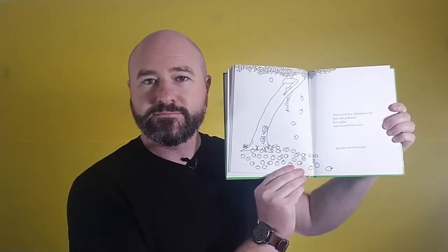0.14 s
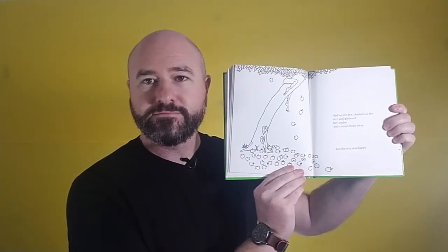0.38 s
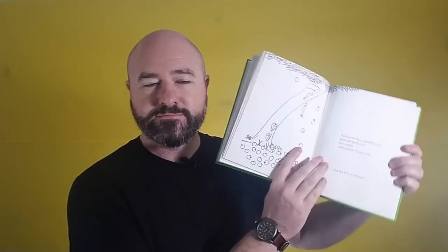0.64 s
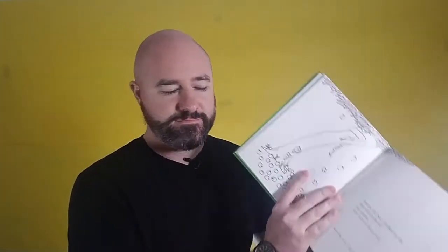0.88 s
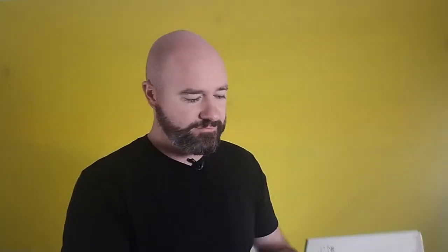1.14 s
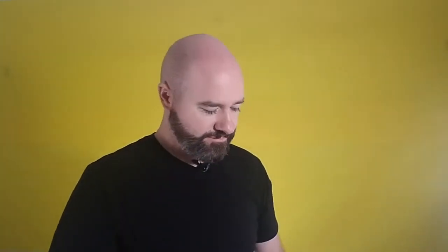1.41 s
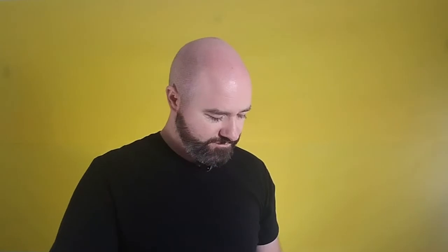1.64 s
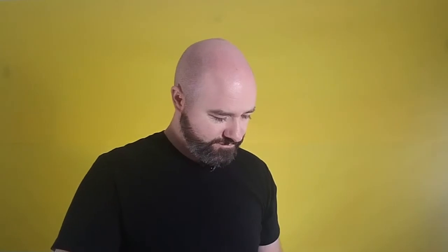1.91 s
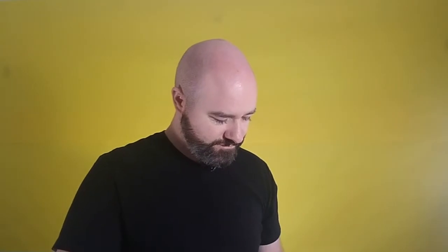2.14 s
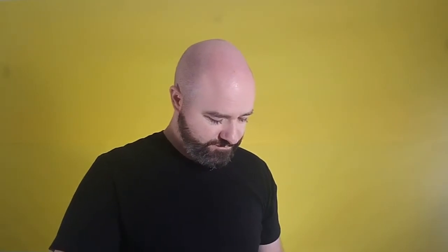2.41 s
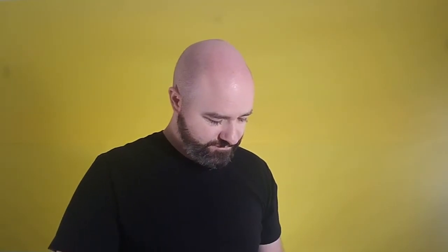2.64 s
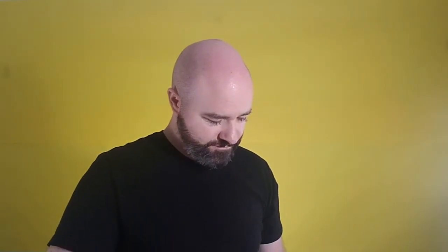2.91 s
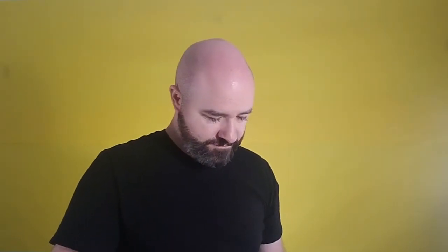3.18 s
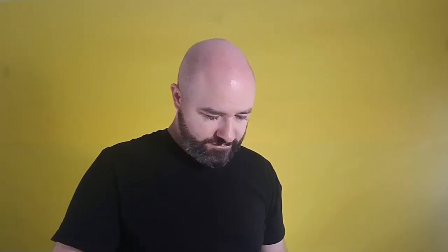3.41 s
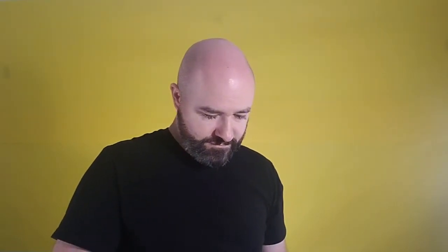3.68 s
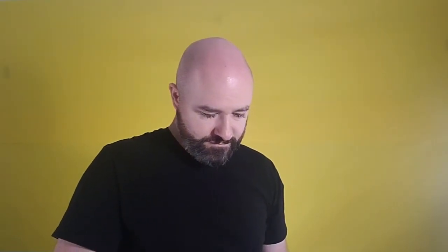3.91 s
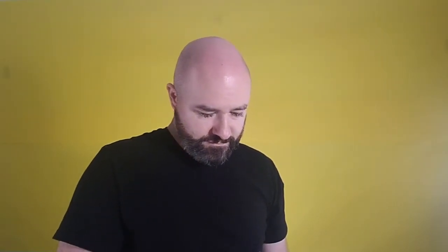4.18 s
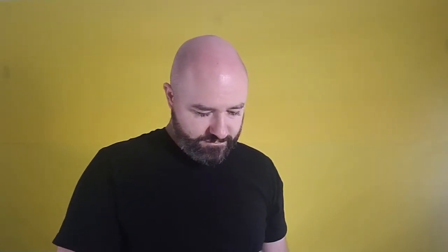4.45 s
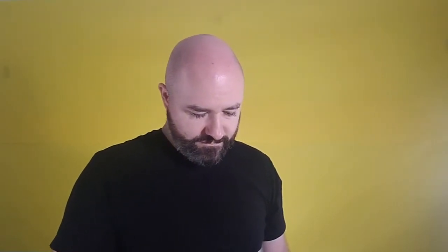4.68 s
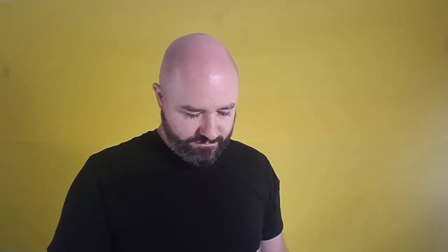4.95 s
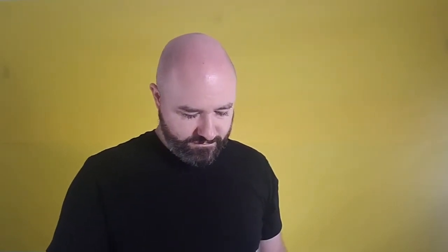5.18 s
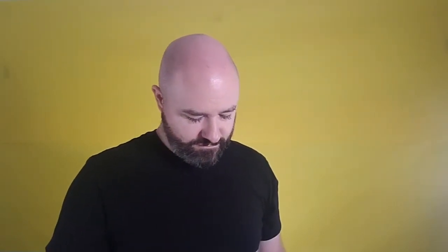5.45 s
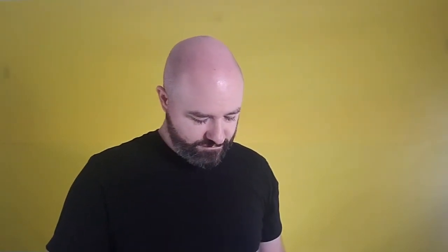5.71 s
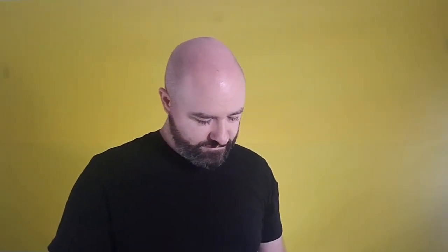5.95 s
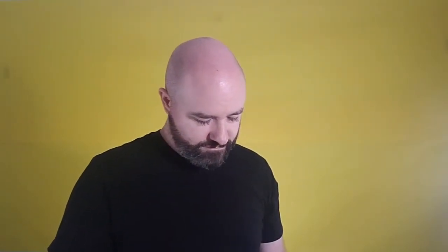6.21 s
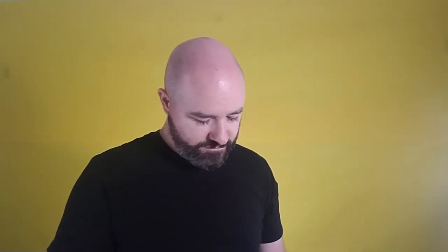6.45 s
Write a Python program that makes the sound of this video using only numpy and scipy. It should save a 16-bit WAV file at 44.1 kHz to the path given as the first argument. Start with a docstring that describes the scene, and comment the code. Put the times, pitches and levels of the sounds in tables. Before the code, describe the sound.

Close to a small clip-on microphone in a quiet, small room, a hardcover book is handled. First only faint scrapes and tiny ticks over a low hum; then light clicks, a rapid rattle of page edges leading into sharp hollow snaps, a lull with short scrapes, and a final few hard snaps and a dry sheet slide.

```python
"""A quiet room, a small clip-on microphone close to a hardcover book that is being leafed through.
Snaps: damped swings of page edges ring the book block, crack, and push and suck a puff of air.
Slides and rustle: random clicks of paper fibres through resonances, with a low sway and rumble of the body.
Underneath: narrow noise bands for the hum of the building, and a steady shaped background noise.
A short noise tail puts the paper sounds in the room; puffs, sway and rumble reach the microphone directly."""
import sys
import numpy as np
from scipy import signal
from scipy.fft import rfft, irfft
from scipy.io import wavfile
from scipy.ndimage import uniform_filter1d

SR = 44100
rng = np.random.default_rng(int(sys.argv[2]) if len(sys.argv) > 2 else 0)


def makeup_ratio(level_db):
    """Linear amplitude ratio for a level in decibels (20 dB per factor of ten)."""
    decades = np.asarray(level_db, float) / 20
    return 10 ** decades


def unload_wav(signal):
    """Save mono or channel-first audio to the path in sys.argv[1] as 16-bit WAV at rate SR, clipped to [-1, 1]."""
    wavfile.write(
        sys.argv[1],
        SR,
        np.round(np.clip(np.atleast_2d(signal).T, -1, 1) * 32767).astype(np.int16),
    )


N = 290442  # samples, about 6.6 s
TIME = np.arange(N) / SR


def level(x, db):
    """Scale to an rms level."""
    return x * makeup_ratio(db) / np.sqrt(np.mean(x ** 2))


def band(x, hz, width):
    """One steep resonance (applied twice), gain 1 at its centre."""
    b, a = signal.iirpeak(hz, hz / width / 1.5, fs=SR)
    once = signal.lfilter(b, a, x)
    return signal.lfilter(b, a, once)


def decay(t, t60):
    """Exponential decay that falls by 60 dB in t60 seconds."""
    return np.exp(-np.log(1000) * t / t60)


def ring(hz, t60, size=6000):
    """A decaying sine that starts from rest."""
    t = TIME[:size]
    return np.sin(2 * np.pi * hz * t) * decay(t, t60)


def walk(rate):
    """Random levels held 1 / rate s and smoothed twice; spread near 1."""
    hold = int(SR / rate)
    steps = np.repeat(rng.standard_normal(N // hold + 1), hold)
    smooth = uniform_filter1d(uniform_filter1d(steps, hold), hold)
    return 1.3 * smooth[:N]


# Narrow hum bands of the building: (pitch_hz, width_hz, level_db), level as rms
HUM_BANDS = [(58, 2.4, -84), (82, 5.7, -81.5), (117.7, 4.3, -69), (147.8, 2.3, -75.5), (177.9, 5.1, -71.5),
             (236.8, 1, -80.5)]


def building_hum():
    """Narrow bands of noise waver like a hum."""
    return sum(level(band(rng.standard_normal(N), hz, width), db) for hz, width, db in HUM_BANDS)


# Spectrum shape of the steady background noise, with a steep fall above 12.6 kHz:
# (freq_hz, relative_db), density per Hz
BACKGROUND_SPECTRUM = [(15, -44), (25, -5.5), (66, 4.5), (167, -8), (375, -28.5), (700, -29), (909, -25.5),
                       (2380, -36), (12600, -41), (16400, -80.5), (22000, -120)]


def background_noise():
    """Steady random noise, shaped in frequency: strongest in the bass, with a faint even hiss above."""
    hz, db = np.transpose(BACKGROUND_SPECTRUM)
    bins = np.maximum(np.arange(N // 2 + 1) * SR / N, 1)
    shape = makeup_ratio(np.interp(np.log(bins), np.log(hz), db))
    noise = irfft(rfft(rng.standard_normal(N)) * shape, N)
    return level(noise, -65)  # dB rms


# Decay of the small room by band: (band_hz, relative_db, t60_s)
ROOM_TAIL = [(310, -13, 0.26), (700, -25.5, 0.32), (1400, -30.5, 0.31), (2600, -23, 0.19),
             (4970, -25.5, 0.086), (9610, -36.5, 0.048)]


def room(x):
    """A small damped room: a noise tail that builds over a few ms and dies sooner in the treble."""
    t = TIME[:20000]
    tail = np.zeros(len(t))
    for hz, db, t60 in ROOM_TAIL:
        tail += makeup_ratio(db) * band(rng.standard_normal(len(t)), hz, 1.1 * hz) * decay(t, t60)
    build_up = np.clip((t - 0.002) / 0.0014, 0, 1)
    return x + signal.fftconvolve(x, 0.099 * tail * build_up)[:N]


def fibres(per_s, spread_db, resonances):
    """Paper fibres catch and slip: tiny clicks of uneven size through the paper's resonances."""
    sizes = rng.standard_normal(N) * makeup_ratio(spread_db * rng.exponential(size=N))
    clicks = (rng.random(N) < per_s / SR) * sizes
    paper = np.zeros(N)
    for k, (hz, width, db) in enumerate(resonances):
        flicker = makeup_ratio(db + 2.0 * walk(28))
        # neighbouring resonances alternate in sign, so they add up between their peaks
        paper += (-1) ** k * flicker * band(clicks, hz, width)
    return level(paper, 0)


def body_rumble(body_db):
    """Arms and clothes rumble near the microphone, more when the hands are busy."""
    low = band(rng.standard_normal(N), 70, 54)
    upper = 0.31 * band(rng.standard_normal(N), 210, 120)
    busy_db = body_db + 73
    # a little over a quarter dB of rumble per dB of rustle, with a slow wander
    rumble_db = -64.5 + 0.27 * busy_db + 1.5 * walk(6.7)
    return makeup_ratio(rumble_db) * level(low + upper, 0)


# Paper under friction, body of the sound: (pitch_hz, width_hz, relative_db)
PAPER_BODY_MODES = [(510, 1380, 15.5), (950, 500, 19.5), (1450, 630, -10), (1940, 170, -0.5)]
# Paper under friction, treble, heard in rustle and slides: (pitch_hz, width_hz, relative_db)
PAPER_TREBLE_MODES = [(3030, 1100, 3.5), (5070, 1000, -7), (7160, 1500, -13.5), (10070, 2500, -36.5)]
# Hands moving on the paper, levels joined by straight lines: (start_s, body_level_db, treble_level_db)
HAND_MOVES = [(0.0, -85.5, -105), (0.73, -81.5, -84), (1.3, -72.5, -88), (1.7, -80, -91),
              (2.15, -81, -89.5), (2.4, -75.5, -71.5), (2.62, -71.5, -88), (2.84, -68.5, -108),
              (3.34, -68, -83.5), (3.8, -65, -80), (4.05, -88.5, -87.5), (4.2, -62, -82),
              (4.64, -76.5, -106), (5.1, -76, -87.5), (5.25, -64, -89), (5.5, -76, -97), (5.92, -72.5, -80),
              (6.59, -61, -100)]


def hands():
    """Continuous rustle of fingers and sleeves, and the rumble of the moving body."""
    start_s, body_points, treble_points = np.transpose(HAND_MOVES)
    body_db = np.interp(TIME, start_s, body_points)
    treble_db = np.interp(TIME, start_s, treble_points)
    body = makeup_ratio(body_db) * fibres(8900, 1.3, PAPER_BODY_MODES)
    treble = makeup_ratio(treble_db) * fibres(12000, 4.1, PAPER_TREBLE_MODES)
    patchy = makeup_ratio(2.0 * walk(40))
    return patchy * (body + treble), body_rumble(body_db)


# Sheets sliding over each other: (start_s, length_s, level_db, pitch_hz, treble_db),
# treble relative to the scrape
SHEET_SLIDES = [(0.645, 0.052, -58.5, 950, -15.5), (0.729, 0.073, -62.5, 620, -8),
                (1.082, 0.04, -56.5, 950, -25), (1.131, 0.015, -62.5, 920, -14.5),
                (1.365, 0.02, -63, 480, -34), (1.433, 0.19, -76, 1500, -0.5), (1.522, 0.033, -57, 740, -30),
                (1.797, .13, -75.5, 1080, -9.5), (1.937, 0.013, -66, 1180, -7),
                (2.183, 0.088, -73.5, 1210, -10), (2.676, 0.0061, -60, 700, -0.5),
                (3.022, .026, -76, 2400, 6.5), (3.102, 0.02, -60, 950, -34), (3.147, 0.066, -68, 1810, -9),
                (3.331, 0.0085, -57.5, 2200, -5.5), (3.263, 0.037, -55, 1560, -8.5),
                (3.682, 0.027, -52, 1400, -8.5), (3.717, 0.024, -63, 1400, -5.5),
                (3.806, 0.053, -58, 1280, -8.5), (4.273, 0.087, -61, 1070, -4),
                (5.029, 0.053, -67.5, 1090, -4.5), (5.155, 0.027, -51, 1120, -4.5),
                (5.18, 0.014, -48.5, 1050, -5.5), (5.19, 0.09, -62.5, 1320, -5),
                (5.293, 0.066, -65.5, 1110, -8), (5.656, 0.12, -67.5, 1260, -12.5),
                (6.348, 0.0094, -55.5, 1450, -16), (6.379, 0.05, -71, 1510, -14),
                (6.448, 0.062, -47, 1500, -9), (6.55, 0.025, -54.5, 1400, -8)]


def slides():
    """A sheet grips, drags for a moment and lets go; its free span sets the pitch of the scrape."""
    grip_share, release_s = 0.19, 0.01  # share of the length spent gathering grip; fade after it
    scrapes, low = np.zeros((2, N))
    grit = fibres(5000, 2.8, [(900, 1500, 0), (2000, 1500, 0)])
    fizz = fibres(9000, 2.2, PAPER_TREBLE_MODES)
    sway = level(band(rng.standard_normal(N), 70, 106), 0)
    for start, length, db, hz, treble_db in SHEET_SLIDES:
        i = slice(int(start * SR), int((start + length + 0.022) * SR))
        t = TIME[i] - start
        grip = np.clip(t / (grip_share * length), 0, 1)
        let_go = np.clip((length - t) / release_s + 1, 0, 1)
        drag = grip * let_go
        scrape = level(band(grit[i], hz, 0.78 * hz), 0)
        scrapes[i] += makeup_ratio(db) * drag * (scrape + makeup_ratio(treble_db) * fizz[i])
        # the hand that drags it sways the whole book
        low[i] += makeup_ratio(0.52 * db - 26.0) * drag * sway[i]
    return makeup_ratio(2.6 * walk(120)) * scrapes, low


# Thud of the hard cover: (pitch_hz, relative_db, t60_s)
COVER_MODES = [(242, -4, 0.043), (403, -1, 0.025), (587, -20, 0.004)]


def puff():
    """The freed page pushes air out with a low thud of the cover, then sucks it back."""
    push_s, suck_s = 0.0105, 0.0063
    t = TIME[:6000]
    push = np.sin(np.pi * np.clip(t / push_s, 0, 1))
    suck = np.sin(np.pi * np.clip((t - push_s) / suck_s, 0, 1))
    thud = sum(makeup_ratio(db) * ring(hz, t60) for hz, db, t60 in COVER_MODES)
    return push - 1.72 * suck + thud


def swing(hz, cycles):
    """A swing that peaks after the given number of cycles and is soon damped; envelope top 1."""
    t = TIME[:6000]
    u = t * hz / cycles
    return np.sin(2 * np.pi * hz * t) * (u * np.exp(1 - u)) ** 2


# Modes of the book block, before scatter: (pitch_hz, relative_db, t60_s)
BOOK_MODES = [(772, -2.5, 0.039), (897, -5, .035), (1190, -8, 0.016), (1470, -7.5, 0.0077),
              (1890, -34, 0.014), (2480, 0, 0.028), (3300, -21, 0.015), (4700, -32, .017)]


def book_block(louder, higher):
    """Each page lands elsewhere on the block, so its modes scatter in level and pitch."""
    scatter_db, pitch_scatter = 4, 0.05  # spread in dB, and as a share of the pitch
    block = np.zeros(6000)
    for (hz, db, t60), a, b in zip(BOOK_MODES, louder, higher):
        block += makeup_ratio(db + scatter_db * a) * ring(hz * (1 + pitch_scatter * b), t60)
    return block


# Resonances in the crack of a released edge: (pitch_hz, width_hz, relative_db)
CRACK_MODES = [(790, 900, 8), (2700, 3450, 21), (4830, 4330, 17.5), (8450, 3100, 16), (14100, 2400, -6)]


def crack(ticks, bright_ticks):
    """Ticks and rattle sound through the edge's resonances; the top ones take the brighter ticks."""
    out = np.zeros(len(ticks))
    for k, (hz, width, db) in enumerate(CRACK_MODES):
        source = bright_ticks if hz > 7000 else ticks
        out += (-1) ** k * makeup_ratio(db) * band(source, hz, width)
    return out


# Page edges let go close to the microphone: (start_s, level_db, pitch_hz, crack_db),
# level before block and room, crack relative to it
PAGE_SNAPS = [(0.733, -54.5, 2980, 9.5), (0.751, -54.5, 1060, 7.5), (0.94, -48.5, 1520, -5),
              (1.067, -50.5, 1210, -18), (1.281, -50.5, 1430, -13), (1.933, -48, 1490, -16),
              (2.726, -30.5, 1540, -12.5), (2.811, -27, 1720, -9), (3.003, -43, 2440, -10),
              (3.331, -27, 1470, -23), (3.366, -36.5, 1400, -19), (3.386, -34.5, 1400, -33),
              (3.398, -34, 1400, -23.5), (3.418, -34, 1590, -22.5), (3.437, -32.5, 1400, -30),
              (3.458, -36.5, 1560, -21.5), (3.475, -30.5, 1500, -20), (3.4785, -15, 1406, -23),
              (3.515, -36, 1310, -18.5), (3.538, -32, 1580, -23), (3.58, -30, 1510, -16),
              (3.583, -13.5, 1338, -18), (3.873, -31.5, 1340, -22), (3.908, -27.5, 1400, -18),
              (3.922, -28, 1370, -19), (3.936, -27.5, 1334, -15.5), (3.992, -24.5, 1460, -15.5),
              (3.9964, -10, 1354, -14.5), (4.118, -13.5, 1460, -16), (4.163, -22.5, 1242, -10),
              (4.719, -56, 1180, -21), (5.406, -50.5, 1950, -9.5), (5.757, -46.5, 1450, -9.5),
              (5.889, -22, 1470, -16), (5.992, -43, 1600, -18), (6.059, -13, 1423, -16),
              (6.2, -11.5, 1423, -14.5), (6.276, -34.5, 1210, -7), (6.373, -47, 1640, -29),
              (6.453, -27.5, 1200, -25), (6.551, -22, 1470, -29), (6.566, -22.5, 1450, -40)]


def snaps():
    """Each edge springs back (rarefaction first), rings the book block, cracks and pushes air."""
    edge_cycles, rattle_s = 0.85, 0.0024  # cycles to the top of the swing; decay time of the rattle
    edges, ticks, bright_ticks, puffs = np.zeros((4, N + 6000))
    air = puff()
    for start, db, hz, crack_db in PAGE_SNAPS:
        i = int(start * SR)
        edge = -makeup_ratio(db) * swing(hz, edge_cycles)
        block = book_block(*rng.standard_normal((2, len(BOOK_MODES))))
        edges[i:i + 6000] += edge + makeup_ratio(-32.5) * signal.fftconvolve(edge, block)[:6000]
        # one clean tick as the edge swings through, amid fibres that rattle for a few ms
        rattle = 0.072 * rng.standard_normal(400) * np.exp(-TIME[:400] / rattle_s)
        rattle[int(edge_cycles / hz * SR)] += 1
        ticks[i:i + 400] += makeup_ratio(db + crack_db) * rattle
        # a harder release is brighter
        bright_ticks[i:i + 400] += makeup_ratio(0.35 * db) * ticks[i:i + 400]
        # the puff grows slightly faster than the snap
        puffs[i:i + 6000] += makeup_ratio(-21 + 1.02 * db) * air
    return edges[:N] + crack(ticks, bright_ticks)[:N], puffs[:N]


def scene():
    """Paper sounds fill the room; puffs, sway and rumble reach the microphone directly."""
    quiet = background_noise() + building_hum()
    rustle, rumble = hands()
    scrape, sway = slides()
    snap, air = snaps()
    paper = room(snap + scrape + rustle)
    return (paper + air + sway + rumble + quiet)[None]


def low_pass(x):
    """Removes everything above the highest recorded frequency."""
    return signal.sosfilt(signal.butter(12, 16830, fs=SR, output="sos"), x)


def record(dry):
    """The microphone rolls off the deepest bass, below 22 Hz."""
    roll_off = signal.butter(2, 22, "high", fs=SR, output="sos")
    mix = signal.sosfilt(roll_off, dry)
    return low_pass(mix)


dry = scene()
out = record(dry)
unload_wav(out)
```